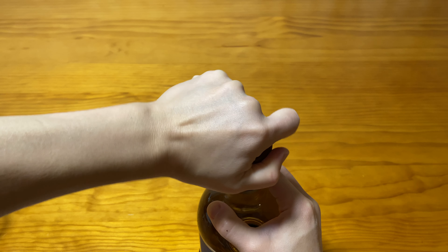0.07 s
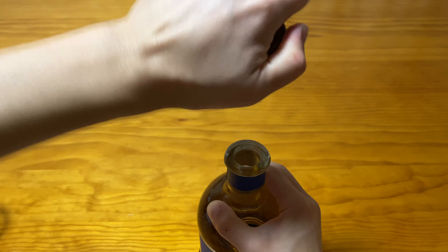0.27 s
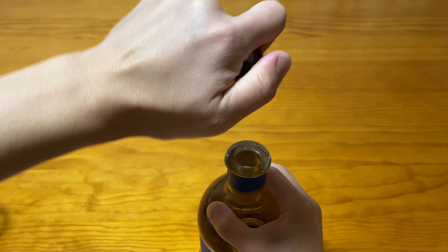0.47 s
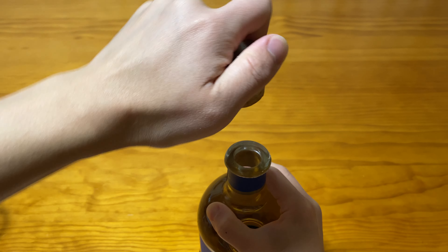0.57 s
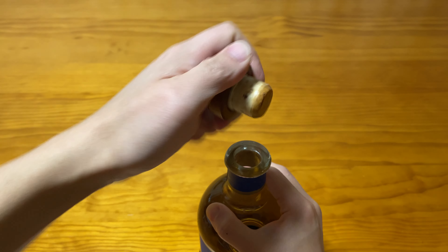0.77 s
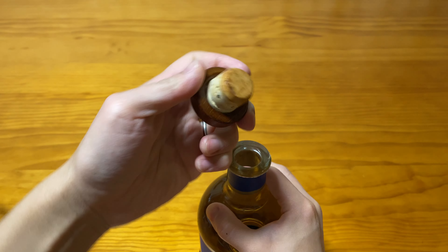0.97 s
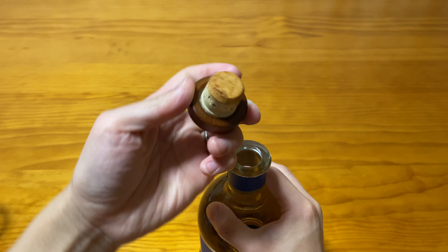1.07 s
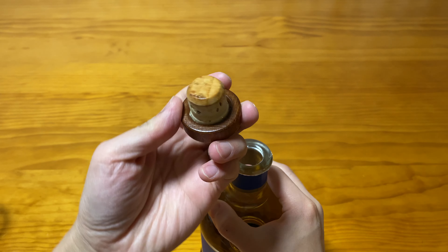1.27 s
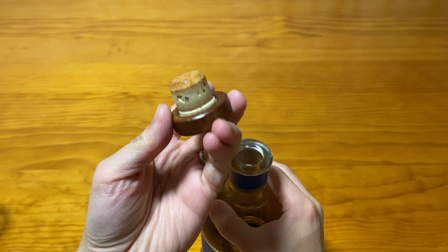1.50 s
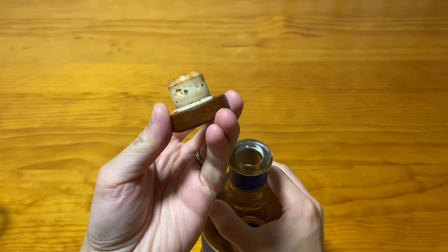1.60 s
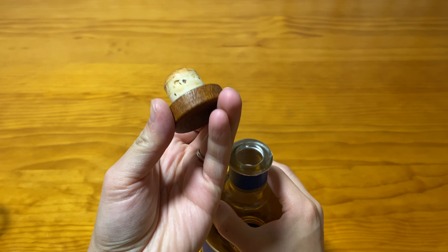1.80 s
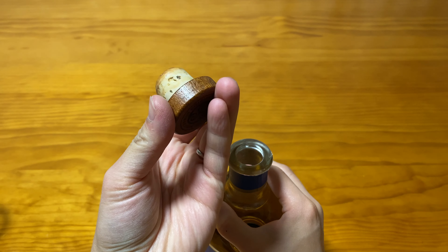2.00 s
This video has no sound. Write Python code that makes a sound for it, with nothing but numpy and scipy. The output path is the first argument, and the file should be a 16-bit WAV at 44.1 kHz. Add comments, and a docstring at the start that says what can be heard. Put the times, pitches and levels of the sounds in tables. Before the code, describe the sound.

One short, hollow cork pop from a bottle in a quiet room, then faint handling.

```python
"""A swelling scrape is heard first: a wood-topped cork slides out of a glass bottle over a table.
Air hisses past its edge and it pops: the air in the neck rings upward in pitch over a falling thump,
and the small, quiet room answers with echoes and a short reverberation. Then fingers turn the stopper,
with faint ticks, rubbing, squeaks and bumps. A low room rumble lies under it all."""
import sys
import numpy as np
from scipy import signal
from scipy.fft import rfft, irfft
from scipy.io import wavfile
from scipy.ndimage import uniform_filter1d

SR = 44100
rng = np.random.default_rng(int(sys.argv[2]) if len(sys.argv) > 2 else 0)


def to_wav(s):
    """Save 16-bit WAV."""
    ch = np.atleast_2d(s).T  # columns
    pcm = np.round(np.clip(ch, -1, 1) * 32767)  # PCM
    wavfile.write(sys.argv[1], SR, pcm.astype(np.int16))


N = 90404
T = np.arange(N) / SR
RELEASE_S, RELEASE_FALL_DB_PER_S = .2226, 3900  # the seal breaks; scrape and spit die away


def from_db(db):
    """The decibel law: amplitude grows tenfold every 20 dB."""
    return 10 ** (np.asarray(db) / 20)


def rms_one(x):
    """Power normalisation: scale to unit rms."""
    return x / np.sqrt(np.mean(x ** 2) + 1e-20)


def at_hz(points, hz):
    """Interpolation of a table on a log-frequency axis."""
    frequencies, values = np.transpose(points)
    return np.interp(np.log(np.maximum(hz, 1)), np.log(frequencies), values)


def noise(spectrum):
    """Spectral shaping of white noise: mono, rms 1."""
    gain = from_db(at_hz(spectrum, np.fft.rfftfreq(N, 1 / SR)))
    return rms_one(irfft(rfft(rng.standard_normal(N)) * gain, N))


def diffuse(size):
    """Diffuse-field coherence: frequencies and white stereo spectra, alike only at long wavelengths."""
    # Likeness of left and right: (frequency [Hz], coherence [0-1])
    coherence = [(60, .92), (140, .9), (290, .7), (640, .15), (1400, 0.02), (15000, .1)]
    hz = np.fft.rfftfreq(size, 1 / SR)
    mid, side = rfft(rng.standard_normal((2, size)))
    alike = at_hz(coherence, hz)
    return hz, np.sqrt((1 + alike) / 2) * mid + np.sqrt((1 - alike) / 2) * side * [[1], [-1]]


def wide_noise(spectrum):
    """Spectral shaping of a diffuse field: stereo, rms 1."""
    hz, white = diffuse(N)
    return rms_one(irfft(white * from_db(at_hz(spectrum, hz)), N))


def grain(depth_db, size=40):
    """Amplitude modulation by friction that is uneven from millisecond to millisecond."""
    roughness = rms_one(uniform_filter1d(rng.standard_normal(N), size))
    return rms_one(from_db(depth_db * roughness))


def swell(peak_s, rise, fall):
    """Exponential growth and decay about a peak, with slopes in dB per second."""
    db = np.where(T < peak_s, (T - peak_s) * rise, (peak_s - T) * fall)
    return from_db(np.maximum(db, -200))


def rumble():
    """The room's background: a steady diffuse field, strongest in the bass."""
    # Rumble spectrum: (frequency [Hz], relative level [dB])
    spectrum = [(20, -24), (35, -10), (60, 0), (100, -4), (170, -2.5), (290, 1.5), (400, -5), (600, -14.5),
                (1000, -20.5), (2000, -29.7), (4500, -35.5), (6200, -42), (11500, -42), (13000, -51),
                (15000, -58)]
    return from_db(-57.8) * wide_noise(spectrum)


def reverberation(x, size=26000, build_s=.012):
    """Convolution with the room's response: a diffuse tail and standing waves, decaying exponentially."""
    # Reverberation time: (frequency [Hz], t60 [s])
    decay_times = [(100, .27), (400, .36), (1000, .33), (4000, .33), (14000, .27)]
    # Spectrum of the tail: (frequency [Hz], level [dB])
    spectrum = [(55, -14), (110, -22), (200, -21), (500, -16), (850, -16), (1100, -21.5), (2500, -17),
                (7000, -17), (15000, -19)]
    # Standing waves: (frequency [Hz], level [dB], t60 [s])
    modes = [(147, -55.5, .18), (860, -63, .24)]
    age = T[:size]
    hz, white = diffuse(size)
    coloured = white * from_db(at_hz(spectrum, hz))
    edges_hz = np.geomspace(30, 20000, 11)
    tail = 0
    for low, high in zip(edges_hz, edges_hz[1:]):
        rate = np.log(1000) / at_hz(decay_times, np.sqrt(low * high))
        band = irfft(coloured * (hz >= low) * (hz < high), size)
        tail += band * np.exp(-rate * age) * np.sqrt(2 * rate / SR)  # envelope of unit energy
    for mode_hz, db, t60 in modes:
        tail += from_db(db) * np.sin(2 * np.pi * mode_hz * age) * np.exp(-np.log(1000) * age / t60)
    build_up = 1 - np.exp(-(age / build_s) ** 2)
    return signal.fftconvolve(x[None], tail * build_up, axes=1)[:, :N]


def reflections(x, mono_below_hz=330):
    """Early reflection: table and near walls return delayed copies, alike on both sides in the bass."""
    # Echoes: (left delay [s], left level [dB], right delay [s], right level [dB])
    echoes = [(.00372, -13.2, .00779, -17.4), (.0065, -13.6, .00884, -29), (.009, -14.8, .01402, -19),
              (.02434, -25, .02222, -19.2), (.02819, -22, .029, -25), (.03931, -29, .03494, -29)]
    left = right = 0
    for left_s, left_db, right_s, right_db in echoes:
        left += from_db(left_db) * np.interp(T - left_s, T, x[0])
        right += from_db(right_db) * np.interp(T - right_s, T, x[1])
    highpass = signal.butter(2, mono_below_hz, "high", fs=SR, output="sos")
    side = signal.sosfiltfilt(highpass, left - right)
    return (left + right + side * [[1], [-1]]) / 2


def bumps():
    """Soft impacts of the shifting hands: slow contact excites mainly low frequencies."""
    # Thuds: (time [s], level [dB])
    thuds = [(.39, -57), (.58, -61), (1.16, -57), (1.25, -63)]
    # Thud spectrum: (frequency [Hz], relative level [dB])
    spectrum = [(20, -20), (45, 0), (75, -3), (130, -22), (500, -60), (2000, -100)]
    return noise(spectrum) * sum(from_db(db) * swell(s, rise=260, fall=260) for s, db in thuds)


def rubs():
    """Sliding friction of the turning hand: each stroke blends a dull and a bright rustle."""
    # Strokes: (time [s], level [dB], 20 dB rise [s], 20 dB fall [s], bright against dull [dB])
    strokes = [(.59, -77, .06, .2, -1), (.765, -76, .18, .22, 7), (.968, -65, .06, .17, -18),
               (1.02, -76, .1, .4, -1), (1.19, -78, .08, .2, -8), (1.615, -69.5, .13, .2, -12),
               (1.85, -74, .25, .15, 0)]
    # Spectra of the two rustles: (frequency [Hz], relative level [dB])
    dull_spectrum = [(100, -6), (330, 7), (900, 0), (2000, 1), (3300, -6), (4800, -10), (8000, -24),
                     (15000, -35)]
    bright_spectrum = [(1000, -20), (3000, -6), (4400, 0), (6000, -4), (7500, -1), (11500, -5),
                       (15000, -14)]
    dull, bright = wide_noise(dull_spectrum), wide_noise(bright_spectrum)
    out = 0
    for s, db, rise_s, fall_s, bright_db in strokes:
        weight = from_db(bright_db)
        rustle = (dull + weight * bright) / np.hypot(1, weight)  # constant power
        out += from_db(db) * swell(s, 20 / rise_s, 20 / fall_s) * rustle
    return out * grain(depth_db=2.5)


def squeaks():
    """Narrow-band friction noise: cork on glass, then skin on polished wood."""
    # Squeaks: (time [s], level [dB], centre [Hz], bandwidth [Hz], 20 dB fall [s])
    slips = [(.195, -68, 2430, 160, .09), (1.24, -76.5, 4150, 550, .09), (1.39, -71, 2280, 300, .035),
             (1.61, -77, 5000, 1000, .12), (1.615, -75, 1600, 800, .08)]
    out = 0
    for s, db, hz, width_hz, fall_s in slips:
        bandpass = signal.butter(2, [hz - width_hz / 2, hz + width_hz / 2], "band", fs=SR, output="sos")
        band = rms_one(signal.sosfilt(bandpass, rng.standard_normal((2, N))))
        out += from_db(db) * band * swell(s, 40 / fall_s, 20 / fall_s)
    return out


def ticks():
    """Tiny impacts of fingertips on the stopper: brief contact gives a broad, bright spectrum."""
    # Contacts: (time [s], level [dB])
    contacts = [(.561, -63.5), (.688, -67.5), (.823, -72), (.961, -72), (1.392, -79)]
    # Tick spectrum: (frequency [Hz], relative level [dB])
    spectrum = [(1000, -3), (2200, 0), (5000, -7), (7200, 1), (11000, -1), (15000, -3), (16000, -13)]
    return noise(spectrum) * sum(from_db(db) * swell(s, rise=7000, fall=2000) for s, db in contacts)


def slide():
    """Sliding friction of cork on glass, growing louder until the cork lets go."""
    # Scrape spectrum: (frequency [Hz], relative level [dB])
    spectrum = [(800, -25), (1600, -14), (2200, -10), (2450, 1), (2800, -13), (4000, -7), (5000, 0),
                (6500, -11), (8000, -17), (10700, -11), (15000, -24)]
    scrape = from_db(-56) * wide_noise(spectrum) * grain(depth_db=3)
    return scrape * swell(RELEASE_S, rise=235, fall=RELEASE_FALL_DB_PER_S)


def leak(rise_db_per_s=3200, side_db=-4):
    """Turbulence: air spits through the opening gap, and the room scatters the sound into a tail."""
    # Spectra of the spit and its tail: (frequency [Hz], relative level [dB])
    spit_spectrum = [(150, -4), (400, 3), (1000, 3), (1400, -2), (1900, -4), (2800, -8), (3500, 4),
                     (4500, -6), (5500, -9), (7200, -6), (8300, -14), (10300, -4), (11300, -5), (12000, 1),
                     (13000, -11), (14700, -2), (16000, -16)]
    tail_spectrum = [(500, -3), (1900, -1), (2600, -2), (3250, 2), (3900, -2), (5000, 0), (7300, -3),
                     (8500, -13), (10500, -5), (12000, -4), (13200, -15), (14700, -9), (16000, -22)]
    mid, side = noise(spit_spectrum), from_db(side_db) * noise(spit_spectrum)
    spit = (mid + side * [[1], [-1]]) * swell(RELEASE_S, rise_db_per_s, RELEASE_FALL_DB_PER_S)
    tail = wide_noise(tail_spectrum) * swell(.228, rise_db_per_s, fall=175)
    return from_db(-26.5) * spit + from_db(-55.5) * tail


def air_mode(start_s, db, start_hz, end_hz, glide_s, attack_s, t60):
    """A damped oscillation of air whose frequency settles exponentially as the mouth opens."""
    age = np.maximum(T - start_s, 0)
    cycles = end_hz * age + (start_hz - end_hz) * glide_s * (1 - np.exp(-age / glide_s))
    envelope = (1 - np.exp(-age / attack_s)) * np.exp(-np.log(1000) * age / t60)
    return from_db(db) * envelope * np.sin(2 * np.pi * cycles)


def pop():
    """Cavity resonance: the bottle's air thumps downward and the neck rings upward, over a low puff."""
    # Air oscillations: (time [s], level [dB], start pitch [Hz], settled pitch [Hz],
    # glide [s], attack [s], t60 [s])
    belly = (.22425, -5.5, 596, 92, .00245, .0006, .046)
    puff = (.2245, -28, 66, 60, .003, .002, .07)
    neck = (.22386, 2.8, 745.6, 1052.5, .00357, .0023, .056)
    return air_mode(*belly) - air_mode(*puff) - air_mode(*neck)  # minus: these start by sucking inward


def scene(balance_db=-.5):
    """Superposition of the nearby bottle and hands with the room around them."""
    transients = pop() + ticks()
    direct = transients + leak()
    pan = from_db([[balance_db / 2], [-balance_db / 2]])
    near = (direct + reflections(direct)) * pan
    return near + reverberation(transients) + slide() + rubs() + squeaks() + bumps() + rumble()


def record(dry, cutoff_hz=15750):
    """The microphone's frequency response: two treble notches and a steep low-pass."""
    # Notches: (frequency [Hz], bandwidth [Hz])
    notches = [(9050, 1300), (13250, 1600)]
    for hz, width_hz in notches:
        dry = signal.lfilter(*signal.iirnotch(hz, hz / width_hz, fs=SR), dry)
    return signal.sosfilt(signal.ellip(10, .1, 80, cutoff_hz, fs=SR, output="sos"), dry)


dry = scene()
out = record(dry)
to_wav(out)
```